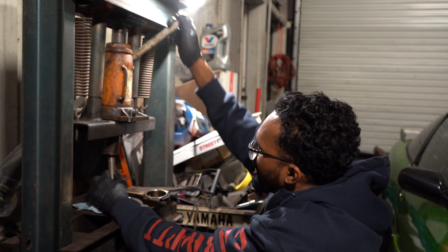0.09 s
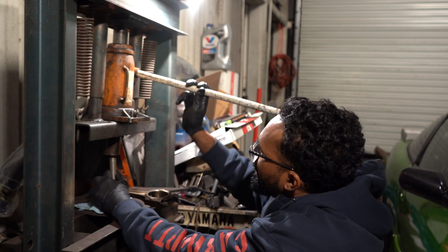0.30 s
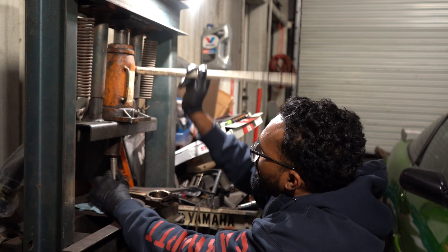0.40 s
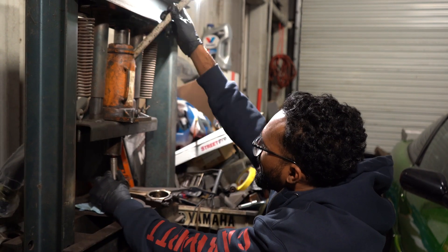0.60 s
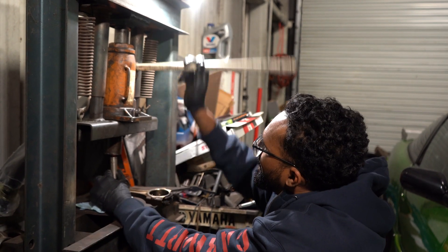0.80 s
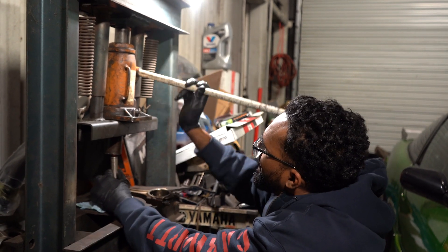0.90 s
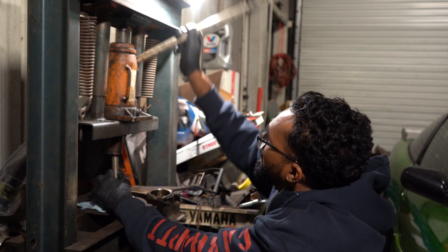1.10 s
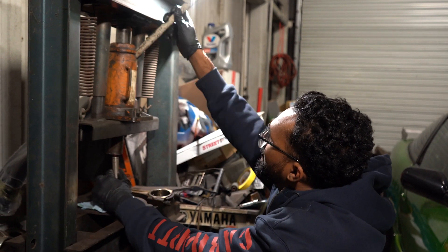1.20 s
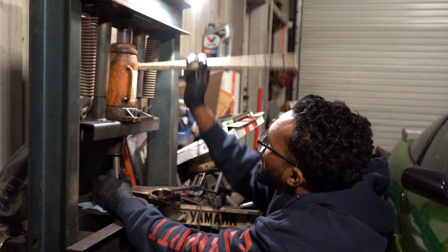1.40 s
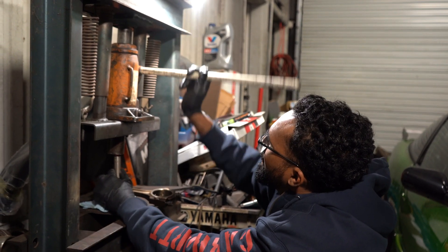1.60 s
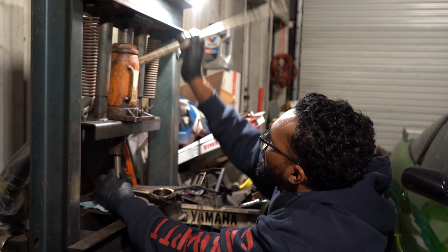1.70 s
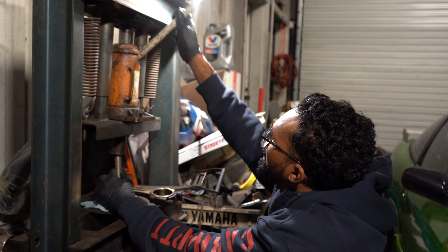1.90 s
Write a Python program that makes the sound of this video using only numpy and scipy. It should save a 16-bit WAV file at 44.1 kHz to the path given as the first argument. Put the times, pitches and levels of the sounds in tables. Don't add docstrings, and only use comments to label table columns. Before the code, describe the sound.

Close microphone on a hand-pumped hydraulic jack: hard bright clanks and small pin ticks, one heavy frame-shaking blow with a rebound, a ringing clack with spring zing, then softer clicks over quiet room hiss and rumble.

```python
import sys
import numpy as np
from scipy import signal
from scipy.fft import rfft, irfft
from scipy.io import wavfile
from scipy.ndimage import uniform_filter1d

SR = 44100
rng = np.random.default_rng(int(sys.argv[2]) if len(sys.argv) > 2 else 0)


def gain_from_db(level_db):
    decades = np.asarray(level_db, float) / 20
    return 10 ** decades


def store_pcm(level_fs):
    pcm = np.round(np.clip(level_fs, -1, 1) * 32767).astype(np.int16)
    wavfile.write(sys.argv[1], SR, np.atleast_2d(pcm).T)


N = 85995
LEAD = 8820

# pitch_hz, level_db
HISS_SPECTRUM = [(100, 3), (181, 2), (364, -8.5), (673, -9.5), (780, -6.5), (1250, -24), (3200, -21.5),
                 (7000, -34), (15800, -45.5)]
# time_s, level_db
RUMBLE_SWAY = [(0.0, -44), (0.102, -40), (0.114, -45), (0.304, -29), (0.38, -35), (0.406, -28),
               (0.554, -44), (0.634, -35), (0.738, -44), (1.14, -33), (1.162, -42), (1.444, -38),
               (1.514, -29), (1.71, -39), (1.726, -35), (1.95, -46)]
# pitch_hz, t60_s
GARAGE_DECAY = [(200, 0.18), (700, 0.76), (2000, 0.34), (5000, 0.27), (12000, 0.12)]

# pitch_hz, density_db (per Hz)
CRACK_SPECTRUM = [(180, -23.5), (300, -40.5), (2910, 3), (3440, 0.5), (4480, -1.5), (7010, -10.5),
                  (14500, -32.5), (15800, -30)]
# start_s, length_s, level_db
HANDLE_SLIDES = [(0.223, 0.0031, -50), (0.243, 0.0065, -19), (0.426, 0.0045, -36), (0.48, .005, -43),
                 (.555, 0.01, -75), (0.674, 0.0074, -41), (0.79, 0.0021, -51), (0.821, 0.0072, -21),
                 (1.016, 0.0049, -31.5), (1.247, 0.0071, -58), (1.415, 0.0076, -24), (1.629, 0.0025, -40),
                 (1.656, 0.0048, -45), (1.796, 0.029, -51), (1.84, 0.0053, -46.5), (1.918, 0.011, -61)]

# pitch_hz, level_db, t60_s, width_hz
FRAME_MODES = [(230, -15, 0.23, 71), (356, -21.5, 0.44, 135), (502, -20.5, 0.088, 440),
               (708, -15.5, 0.16, 82), (1030, -20.5, 0.1, 220), (1390, -11, 0.069, 250)]
# pitch_hz, level_db, t60_s, width_hz
KNOCK_MODES = [(817, -18.5, 0.42, 110), (1160, -17.5, 0.1, 130), (1840, -12.5, 0.11, 180),
               (1820, -16, 0.27, 140), (2200, -15, 0.16, 420), (2600, -13.5, 0.33, 330),
               (3580, -21.5, 0.32, 510), (4740, -25.5, 0.25, 1040)]
KNOCK_START_S = [
    .661,
    0.7,
]
KNOCK_LEVEL_DB = [
    -1.5,
    -8.5,
]
# pitch_hz, level_db, t60_s, width_hz
SPRING_MODES = [(12250, -26, .3, 220), (7450, -30, .2, 200)]
SPRING_START_S = [
    .829,
    1.02,
]
SPRING_LEVEL_DB = [
    -12,
    -36,
]
# start_s, level_db, pitch_hz, t60_s,
# width_hz
FRAME_GROANS = [(0.259, -24, 670, 0.23, 89), (.352, -19, 407, 0.28, 149), (0.828, -22, 743, 0.18, 90),
                (.95, -29, 756, .1, 102.3), (1.035, -28.5, 4930, 0.24, 120), (1.148, -24, 780, 0.048, 100),
                (1.43, -25.5, 740, 0.16, 88), (1.555, -23, 546, 0.047, 80), (1.587, -19.5, 960, .05, 400),
                (1.65, -26, 5420, 0.086, 298), (1.781, -29, 750, 0.062, 90)]

# start_s, peak_db, tilt_db (per octave), frame_db (share of the frame), favoured_hz
LINKAGE_CLACKS = [(0.0328, -17, -3.5, -5, 1990), (0.2477, -1.5, -4, -22, 2110),
                  (0.2545, 3, -0.5, -11.5, 2600), (0.3481, 1, -1, -6.5, 3500), (0.3624, -4, -1.5, -5, 2850),
                  (0.4240, -17, -12, 0, 2200), (0.4505, -3, 1.5, -13, 5080), (0.6613, 4.5, -2.6, -25, 2050),
                  (0.6725, -11, -5, -35, 1800), (0.6932, -7.5, -1.5, -38, 2600), (0.819, -8, 1, -27, 4970),
                  (0.821, -0.5, 9.5, -25, 3470), (0.8270, 2.5, 0.8, -10.5, 4930),
                  (0.8335, -7, -6.5, -22, 3650), (0.949, -4.5, -4, -7.5, 3330),
                  (0.9622, -19.5, 6, -25, 4000), (1.0122, -22, -9.5, 1, 2420),
                  (1.0301, -11, -2.8, -9.5, 2770), (1.0335, -13.5, -1, -14, 3280),
                  (1.0372, -16, -6, -16.5, 3010), (1.0415, -29, -3, -1, 1200),
                  (1.0495, -18.5, 2.5, -6, 2640), (1.1159, -16.5, 7.5, -18, 2840),
                  (1.1478, -24.5, -8, 0.5, 3330), (1.4205, -11, -2.5, -25, 2500),
                  (1.4282, -8.5, 9, -7, 2500), (1.4325, -12, -4.5, -21, 3500),
                  (1.4436, -11.5, -6.5, -5, 1510), (1.5564, -3.5, -1.5, -10, 3830),
                  (1.5704, -9.5, -14, -9, 2460), (1.5894, -14.5, -26.5, -3.5, 1000),
                  (1.6232, -18, -12.5, -14, 2500), (1.6364, -22, 10, 4, 2900),
                  (1.645, -13.5, 3.5, -10, 2600), (1.6521, -4.5, -1.3, -28, 4730),
                  (1.6715, -25, -19, -5, 2600), (1.7664, -38, 9, 7, 2500), (1.7791, -17, -4.5, -13, 3320)]
# pitch_hz, level_db, t60_s
LINKAGE_MODES = [(1100, -13, .015), (1490, -6, .018), (2130, -5, .015), (2520, -3, .015), (2950, -5, .012),
                 (3320, 0, .016), (3650, -1, .015), (4200, -4, .015), (4750, -6, .015), (5400, -12, .015),
                 (6600, -18, .015)]
# start_s, peak_db
PIN_HITS = [(0.227, -30), (0.4616, -8), (0.4796, -12), (0.7973, -13), (0.861, -26), (1.009, -22),
            (1.0172, -20), (1.049, -9.5), (1.067, -22), (1.059, -24), (1.1235, -28), (1.404, -20),
            (1.421, -18), (1.1160, -20), (1.1476, -23), (1.4198, -12.5), (1.43, -13), (1.708, -29)]
# pitch_hz, level_db, t60_s
PIN_MODES = [(2450, -4, .013), (2750, 0, .016), (3100, -6, .013), (5050, -20, .03)]
# start_s, level_db, pitch_hz, t60_s
CLEAR_PINGS = [(.034, -31.5, 1540, 0.026), (.229, -18.5, 1140, 0.086), (.2477, -16, 2190, 0.028),
               (.2548, -7, 2530, 0.028), (0.35, -5.5, 4300, 0.019), (0.45, -14, 4600, 0.027),
               (.6615, -8, 830, 0.048), (0.66, -6, 1250, 0.023), (.6615, -9.5, 2600, 0.035),
               (0.69, -8.5, 2540, 0.045), (1.1, -23, 1200, .025), (1.417, -18.5, 1475, 0.027),
               (1.557, -21, 1490, .04), (1.559, -20.5, 556, 0.055), (1.652, -13, 4750, 0.037),
               (1.6537, -20, 5400, 0.035), (1.6525, -12, 2150, 0.031), (1.779, -19, 3420, 0.028),
               (1.779, -29, 2550, 0.033), (0.3, -9, 3280, .022), (1.557, -15.5, 4250, .025),
               (1.5565, -10.5, 3300, 0.035), (1.1165, -20, 2400, 0.047), (.6625, -10, 1800, 0.044),
               (.697, -22, 840, 0.18), (.8215, -11, 3450, .03), (.2555, -11.5, 3300, .03),
               (1.4285, -16, 2500, 0.038), (.694, -13.5, 1870, 0.12)]

# start_s, peak_db, tilt_db (per octave)
SOCKET_HITS = [(0.2322, 2, -4.5), (.2474, -13, 10), (0.4498, -14, 6), (.8046, -2, -8), (0.814, -18, 4),
               (.821, -13, 4), (.8274, -10.5, 7), (1.0165, -22.5, 10), (1.0494, -18.5, 2.5),
               (1.3978, -31, 1), (1.4064, -17.5, -5.5), (1.4202, -35, 11), (1.4287, -15.5, 13.5),
               (1.6515, -18, 4.5)]
# pitch_hz, level_db, t60_s
PIPE_MODES = [(2073, -19, .02), (3380, 0, .024), (3520, -5, .024), (4915, -8, .04), (6648, -13, .045),
              (8549, -20, .035), (10490, -21, .025), (12250, -26, .025)]
# pitch_hz, level_db, t60_s, width_hz
PIPE_CLUSTERS = [(3450, -21, .1, 800), (5000, -19, .2, 400), (6650, -28, .12, 300), (8550, -33, .15, 200)]


def rms_one(x):
    return x / np.sqrt(np.mean(x ** 2) + 1e-20)


def at_hz(points, hz):
    table_hz, values = np.array(points)[:, 0], np.array(points)[:, 1]
    return np.interp(np.log(hz), np.log(table_hz), values)


def coloured(x, spectrum):
    hz = np.maximum(np.fft.rfftfreq(len(x), 1 / SR), 1)
    return irfft(rfft(x) * gain_from_db(at_hz(spectrum, hz)), len(x))


def filtered(x, order, hz, kind):
    return signal.sosfilt(signal.butter(order, hz, kind, fs=SR, output="sos"), x)


def ring(clicks, hz, t60):
    radius = gain_from_db(-60 / (max(t60, .005) * SR))
    angle = 2 * np.pi * hz / SR
    return signal.lfilter([0, np.sin(angle)], [1, -2 * radius * np.cos(angle), radius ** 2], clicks + 1e-18)


def background():
    hiss = gain_from_db(-42.5) * rms_one(coloured(rng.standard_normal(N), [(30, -3)] + list(HISS_SPECTRUM)))
    drone_hz, drone_width_hz = 768, 45
    drone = gain_from_db(-49.5) * rms_one(ring(rng.standard_normal(N), drone_hz, 2.2 / drone_width_hz))
    low = filtered(rng.standard_normal(N + LEAD), 4, [12, 52], "band")[LEAD:]
    low = low / np.sqrt(uniform_filter1d(low ** 2, size=5000) + 1e-12)
    s, db = np.transpose(RUMBLE_SWAY)
    sway_db = np.interp(np.arange(N) / SR, s, db)
    return hiss + drone + gain_from_db(-1 + sway_db) * low


def garage(x):
    onset_s = 0.001
    t = np.arange(SR) / SR
    tail = np.zeros(SR)
    for low_hz in 90 * 2 ** np.arange(0, 8, 1.):
        band = filtered(rng.standard_normal(SR), 2, [low_hz, min(2 * low_hz, 20000)], "band")
        tail += band * gain_from_db(-60 * t / at_hz(GARAGE_DECAY, low_hz * np.sqrt(2)))
    tail = tail * (1 - np.exp(-(t / onset_s) ** 2))
    return signal.fftconvolve(x, tail / np.sqrt(np.sum(tail ** 2)))[:len(x)]


def cracks(s, db, tilt_db):
    crack_s, size, before = 0.0036, 2048, 128
    out = np.zeros(N + LEAD)
    t = np.arange(size) / SR
    hz = np.maximum(np.fft.rfftfreq(size, 1 / SR), 100)
    bursts = rng.standard_normal((len(s), size)) * np.exp(-(t / crack_s) ** 4)
    for start, level_db, tilt, burst in zip(s, db, tilt_db, bursts):
        colour_db = at_hz(CRACK_SPECTRUM, hz) + tilt * np.log2(np.maximum(hz, 1000) / 3000)
        burst = irfft(rfft(np.roll(burst, before)) * gain_from_db(colour_db))
        i = int(start * SR) + LEAD - before
        out[i:i + size] += gain_from_db(level_db) * burst / burst[before:300].std()
    return out


def strike(s, db, tilt_db, modes, touches, scatter_db, favour_hz=1.):
    chatter_s, chatter_per_s = .003, 2500
    favour_db, favour_octaves = 7, .25
    s, out = np.asarray(s), np.zeros(N + LEAD)
    late = np.cumsum(rng.exponential(1, (len(s), touches)), axis=1) * SR / chatter_per_s
    late -= late[:, :1]
    at = np.clip((s[:, None] * SR + LEAD + late).astype(int), 0, N + LEAD - 1)
    fade = np.exp(-late / (chatter_s * SR))
    chance = rng.normal(0, 1, (len(s), len(modes)))
    signs = rng.normal(0, 1, (len(s), len(modes), touches))
    signs /= np.sqrt(np.sum((signs * fade[:, None]) ** 2, axis=2, keepdims=True))
    for k, (hz, level_db, t60) in enumerate(modes):
        bright_db = np.clip(tilt_db, -8, 5) * np.log2(hz / 3000)
        favoured_db = favour_db * np.exp(-(np.log2(hz / favour_hz) / favour_octaves) ** 2)
        gain = gain_from_db(db + level_db + bright_db + scatter_db * chance[:, k] + favoured_db)
        clicks = np.zeros(N + LEAD)
        np.add.at(clicks, at, gain[:, None] * fade * signs[:, k])
        out += ring(clicks, hz, t60)
    return out


def shudder(s, db, clusters):
    scatter_db, swell_cycles = 1.5, 5.45
    out, at = np.zeros(N + LEAD), (np.asarray(s) * SR + LEAD).astype(int)
    chance = rng.normal(0, 1, (len(at), len(clusters)))
    for k, (hz, level_db, t60, width_hz) in enumerate(clusters):
        energy = np.zeros(N + LEAD)
        np.add.at(energy, at, gain_from_db(2 * (db + level_db + scatter_db * chance[:, k])))
        swell = np.sqrt(signal.lfilter([1], [1, -gain_from_db(-120 / (t60 * SR))], energy + 1e-18))
        lag = np.exp(-hz / (swell_cycles * SR))
        swell = signal.lfilter([1 - lag], [1, -lag], swell)
        noise = ring(swell * rng.standard_normal(N + LEAD), hz, 2.2 / width_hz)
        out += noise * 2 * np.sqrt(np.pi * width_hz / SR)
    return out


def frame():
    out = shudder(KNOCK_START_S, np.array(KNOCK_LEVEL_DB), KNOCK_MODES)
    out += shudder(SPRING_START_S, np.array(SPRING_LEVEL_DB), SPRING_MODES)
    for s, db, hz, t60, width_hz in FRAME_GROANS:
        out += shudder([s], db, [(hz, 0, t60, width_hz)])
    return out


def pings():
    out = np.zeros(N + LEAD)
    for s, db, hz, t60 in CLEAR_PINGS:
        out += strike([s], db, 0, [(hz, 0, t60)], touches=2, scatter_db=1)
    return out


def pin_ticks():
    s, db = np.transpose(PIN_HITS)
    ticks = strike(s, db - 0.5, 0 * s, PIN_MODES, touches=3, scatter_db=1.5)
    return filtered(ticks, 3, 1900, "high")


def linkage():
    earlier = (-0.0091, -19.5, 0, -12, 3000)
    s, db, tilt_db, frame_db, favour_hz = np.transpose([earlier] + list(LINKAGE_CLACKS))
    clacks = strike(s, db - 13, tilt_db, LINKAGE_MODES, touches=8, scatter_db=2.5, favour_hz=favour_hz)
    shaken = shudder(s, db + frame_db, FRAME_MODES)
    rings = clacks + shaken + pin_ticks() + frame() + pings()
    return np.array([rings, cracks(s, db - 12, tilt_db)])


def slides():
    t = (np.arange(N + LEAD) - LEAD) / SR
    swell = np.zeros(N + LEAD)
    for s, length, db in HANDLE_SLIDES:
        swell += gain_from_db(db) * np.exp(-((t - s) / length - 1) ** 2 * 2)
    grit = rng.standard_normal(N + LEAD) * rng.exponential(1, N + LEAD)
    return swell * rms_one(signal.lfilter(*signal.butter(1, 1500, "high", fs=SR), grit))


def pipe():
    s, db, tilt_db = np.transpose(SOCKET_HITS)
    rings = strike(s, db - 1.5, tilt_db, PIPE_MODES, touches=1, scatter_db=0.5)
    rings = rings + shudder(s, db - 1.5, PIPE_CLUSTERS)
    return np.array([rings, cracks(s, db - 20, tilt_db)])


def scene():
    rings, noise = filtered(pipe() + linkage(), 3, 341, "high")
    noise = noise + slides()
    tail = garage(gain_from_db(-12) * rings + noise)
    near = rings + noise + gain_from_db(-4.5) * tail
    return (near[LEAD:] + background())[None]


def band_limit(x):
    return signal.sosfilt(signal.butter(12, 15950, fs=SR, output="sos"), x)


def record(dry):
    cut = signal.sosfilt(signal.cheby2(12, 40, 16100, fs=SR, output="sos"), dry)
    mix = np.clip(1.26 * np.tanh(cut / 1.393), -1, 1)
    return band_limit(mix)


dry = scene()
out = record(dry)
store_pcm(out)
```